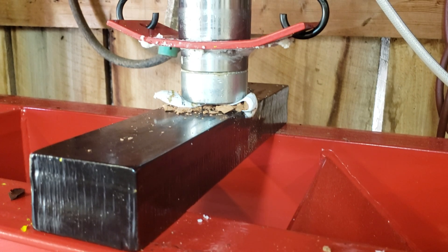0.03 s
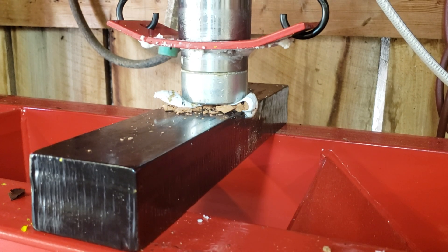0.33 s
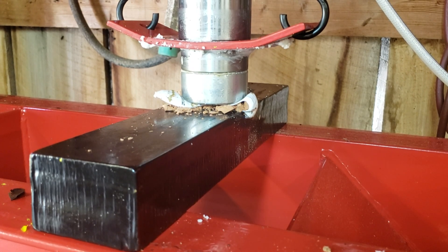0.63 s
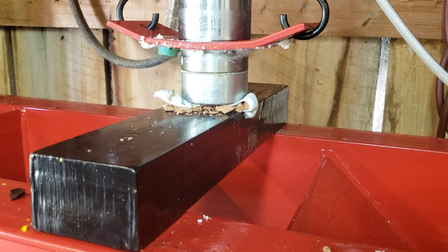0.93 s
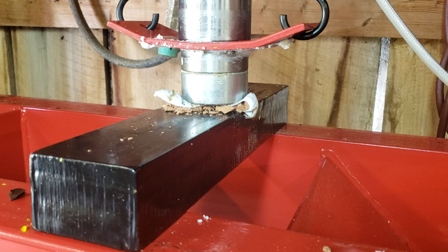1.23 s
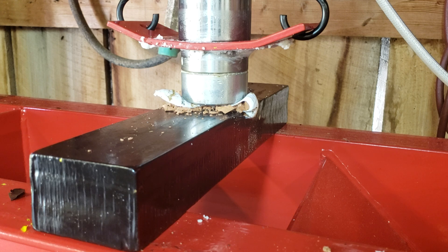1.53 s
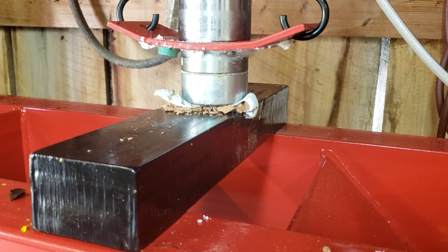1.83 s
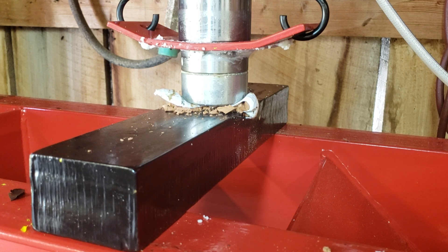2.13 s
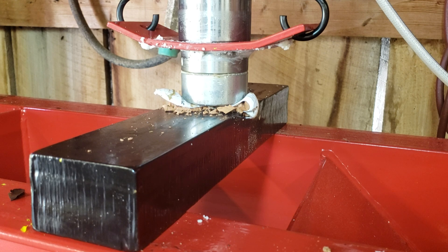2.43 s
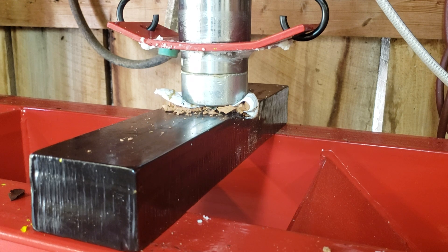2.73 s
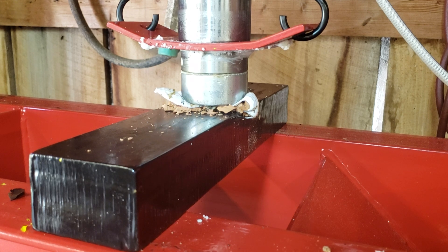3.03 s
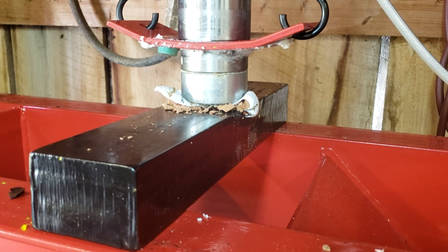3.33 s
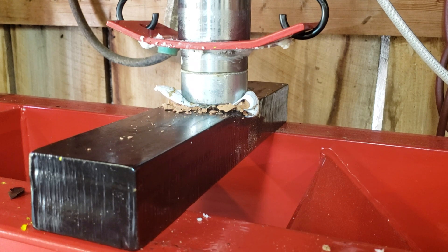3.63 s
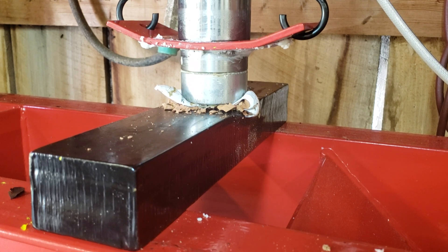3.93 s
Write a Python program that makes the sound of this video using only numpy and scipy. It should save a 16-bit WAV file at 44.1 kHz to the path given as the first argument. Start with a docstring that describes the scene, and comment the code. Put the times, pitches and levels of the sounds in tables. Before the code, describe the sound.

Rapid hissing and knocking from a close air pump driving a hydraulic press, over steady rumble.

```python
"""A sharp hiss, then a knock, about twelve times a second: an air-driven hydraulic pump, close by and
to the right of the microphone in a small wooden workshop. Each stroke vents a jet and a puff of air,
then the piston knocks and rings the steel frame, the casing and the room. As the press takes up load
the pump slows and the knock hardens. The work under the ram gives one faint squeak and, later, one
dry tick. Behind it all lie a steady rumble and a leak of air."""
import sys
import numpy as np
from scipy import signal
from scipy.fft import rfft, irfft
from scipy.io import wavfile
from scipy.ndimage import uniform_filter1d

SR = 44100
rng = np.random.default_rng(int(sys.argv[2]) if len(sys.argv) > 2 else 0)


def log_audio(samples):
    """Write samples as a 16-bit WAV file to the path given in sys.argv[1]."""
    # one column per channel
    frames = np.atleast_2d(samples).T
    # limit to full scale, then quantise
    limited = np.clip(frames, -1, 1)
    pcm = np.round(limited * 32767).astype(np.int16)
    wavfile.write(sys.argv[1], SR, pcm)


N = 176400

# pump speed, falling under load (time [s], rate [strokes/s])
STROKE_RATE = [(0, 13.328), (.3, 13.093), (1.3, 12.584), (2.2, 12.189), (2.65, 12.178), (2.8, 12.032),
               (3.3, 11.909), (4, 11.537)]
# piston knock, straight to the microphone (frequency [Hz], left [dB], right [dB])
KNOCK_COLOUR = [(42.3, 0, -7), (129, 5, 18.5), (312, 21.5, 24.5), (602, 19, 26.5), (930, 8, 18),
                (1224, 9.5, 18.5), (1600, -3, 3.5), (2200, 2.5, -13.5), (5150, -31, -19)]
# diffuse echo of the knock (frequency [Hz], left [dB], right [dB])
KNOCK_ROOM_COLOUR = [(40, 8.5, -9), (125, 16.5, 5.5), (258, 17.5, 7), (468, 14, 28.5), (734, 15, 21),
                     (914, 9, 11), (1170, 8, 13.5), (1480, 14, 12), (1780, -4, 0), (2920, 0.5, 6.5),
                     (3330, -7, -7)]
# hard edge that the knock gains under load (frequency [Hz], left [dB], right [dB])
CLACK_COLOUR = [(395, -6.5, -3), (710, 4, 6), (1290, -12, -8), (1750, -29, -4), (2120, -27, 11),
                (3030, -10, -4), (3350, -27, -14), (4230, -8, 3.5), (8000, -24, -24)]
# resonances of the press frame (frequency [Hz], left [dB], right [dB], t60 [s])
FRAME_MODES = [(325.3, -35.5, -37, 0.36), (358.2, -36.5, -26, 0.29), (400.9, -26.5, -30, 0.26),
               (470, -28, -50, 0.19), (494.2, -31, -28, 0.24), (568, -41.5, -36.5, 0.55),
               (634.6, -21.5, -27.5, 0.2), (666, -27.5, -48, 0.17), (741.6, -52, -28, 0.31)]
# resonances of the pump casing (frequency [Hz], left [dB], right [dB], t60 [s])
CASING_MODES = [(876, -52, -30.5, 0.24), (918, -46, -32, 0.21), (1052, -31.5, -24.5, 0.31),
                (1160, -51, -33.5, 0.45), (1165.6, -56, -31, 0.24), (1366, -39, -22, 0.097),
                (1407, -41, -30, 0.1), (1423, -48, -41, .1), (1647, -49, -38.5, 0.51),
                (2120, -57, -51, 0.063)]
# low resonances of the workshop (frequency [Hz], left [dB], right [dB], t60 [s])
ROOM_MODES = [(42.5, -59, -55, 0.23), (62.6, -36.5, -36, 0.43), (94.8, -32, -38, 0.46),
              (128.76, -27.5, -27, 0.28), (143.3, -30, -27, 0.23), (198.4, -33.5, -32, 0.25),
              (242.8, -34, -39, 0.28)]
# exhaust jet, straight to the microphone (frequency [Hz], left [dB], right [dB])
JET_COLOUR = [(300, -59, -51), (2000, -53, -47), (3430, -37, -29), (4400, -25.5, -18), (5670, -28.5, -21),
              (6500, -11, -14), (8000, -36, -15.5), (10000, -21, -15), (10500, -13, -5.5), (11630, -19, 0),
              (11850, -10, 0.5), (14100, -27, -3.5), (14200, -29, -5), (13600, -26, -10),
              (15500, -29, -5.5)]
# exhaust jet scattered by the workshop (frequency [Hz], left [dB], right [dB])
JET_ROOM_COLOUR = [(200, -17.5, -14.5), (695, -17.5, -16.5), (1670, -23.5, -19), (3380, -23.5, -20),
                   (5720, -27.5, -21), (7240, -38, -11.5), (7500, -19, -9), (9000, -29, -19.5),
                   (10000, -15.5, -19), (10540, -32, -9), (12300, -19, -9.5), (14400, -37, -11),
                   (16400, -13, -40.5)]
# tick of the loaded work (time [s], level [dB])
WORK_TICKS = [(2.5507, -2.5)]
# spectrum of that tick (frequency [Hz], left [dB], right [dB])
TICK_COLOUR = [(500, -13, -9), (3000, 2, -6), (6300, -5, 2), (9000, -6, 7), (15000, -5, -8)]
# steady rumble and leaking air (frequency [Hz], left [dB], right [dB])
ROOM_TONE_COLOUR = [(20, -25, -27), (56, -22, -21), (81, -26, -20), (115, -25, -21.5), (302, -21.5, -16.5),
                    (920, -27.5, -26), (2020, -36, -36.5), (3380, -42.5, -37), (6000, -39.5, -37),
                    (11900, -45, -48), (16000, -35, -32)]

LEAD_IN_S = .4  # the pump is already running
FIRST_KNOCK_CYCLES, VENT_LEAD_CYCLES = .552, .206
LEFT_LAG_S = 0.000405  # the left side of the microphone is farther from the pump
KNOCK_SCATTER_DB, KNOCK_DB_PER_S, KNOCK_T60_S, RATTLE_DB = -0.15, -0.06, 0.21, -12
FLOOR_ECHO_S, FLOOR_ECHO_DB, WALL_ECHO_S, WALL_ECHO_DB = 0.001834, -3.5, .0085, -16
FRAME_DELAY_S, CASING_DELAY_S, BOOM_DELAY_S = 0.00093, 0.001217, 0.0032
CLACK_DB_PER_S, CLACK_T60_S = 3, 0.051
VENT_OPEN_S, VENT_HOLD_S, VENT_FALL_S = .005, 0.0019, 0.0086
VENT_SCATTER_DB, VENT_FLUTTER_DB, VENT_JITTER_S, VENT_DB_PER_S = 0.85, 0.5, 0.00022, .1
NEAR_T60_S, FAR_T60_S, FAR_DB, REFLECTION_BUILD_S = 0.062, 0.31, -2.5, 0.0033
PUFF_HZ, PUFF_DB, PUFF_DELAY_S, PUFF_DB_PER_S = 101, -24.5, 0.0022, -0.3  # levels relative to the vent
SPIT_DB, SPIT_SCATTER_DB, SPIT_DELAY_S = -1, 4, 0.0039
SQUEAK_AT_S, SQUEAK_WIDTH_S, SQUEAK_HZ, SQUEAK_WOBBLE, SQUEAK_DB = .41, 0.087, 3210, 0.038, -39.5
TOP_HZ = 15750


def piston(times):
    """A dull knock, close up: it echoes off floor and wall, rings steel and room, hardens with load."""
    sizes = undb(KNOCK_SCATTER_DB * rng.standard_normal(len(times)))
    blows = impulses(times, sizes) * loading(KNOCK_DB_PER_S)
    off_floor = undb(FLOOR_ECHO_DB) * delay(blows, FLOOR_ECHO_S)
    off_wall = undb(WALL_ECHO_DB) * delay(blows, WALL_ECHO_S)
    knock = -colour(blows + off_floor + off_wall, KNOCK_COLOUR)
    frame = through(delay(blows, FRAME_DELAY_S), ring(FRAME_MODES, build_s=.0015))
    casing = through(delay(blows, CASING_DELAY_S), ring(CASING_MODES, build_s=.0015, spread=1))
    left, right = knock + frame + casing
    boom = -through(delay(blows, BOOM_DELAY_S), ring(ROOM_MODES, build_s=.0012))
    echo = scatter(KNOCK_T60_S, build_s=0.0025)
    # noise that fades with the echo, new on every stroke
    rattle = np.sqrt(np.abs(through(blows, echo ** 2))) * rng.standard_normal((2, len(blows)))
    room = colour(through(blows, echo) + undb(RATTLE_DB) * rattle, KNOCK_ROOM_COLOUR)
    clack = colour(through(blows * loading(CLACK_DB_PER_S), scatter(CLACK_T60_S)), CLACK_COLOUR)
    return np.array([delay(left, LEFT_LAG_S), right]) + boom + room + clack


def exhaust(times, cycles):
    """The valve opens before each knock: a low puff, a spit and a fluttering jet that fills the room."""
    t = clock()
    size, late, spit = rng.standard_normal((len(times), 3)).T
    opens = times - VENT_LEAD_CYCLES * cycles + VENT_JITTER_S * late
    vents = impulses(opens, undb(VENT_SCATTER_DB * size)) * loading(VENT_DB_PER_S)
    age = np.arange(SR // 10) / SR
    opening = np.minimum(age / VENT_OPEN_S, 1) ** 1.1
    emptying = np.exp(-np.maximum(age - VENT_OPEN_S - VENT_HOLD_S, 0) / VENT_FALL_S)
    flow = through(vents, opening * emptying)[0]
    flutter = undb(VENT_FLUTTER_DB * wander(samples=40))
    jet = flow * flutter * rng.standard_normal(len(t))
    jet += impulses(opens + SPIT_DELAY_S, undb(SPIT_DB + SPIT_SCATTER_DB * spit))
    direct = undb(-3) * np.array([delay(jet, LEFT_LAG_S), jet])
    direct += undb(-5) * through(jet, scatter(t60=0.0055))
    near_walls = scatter(NEAR_T60_S, REFLECTION_BUILD_S)
    far_walls = undb(FAR_DB) * scatter(FAR_T60_S, REFLECTION_BUILD_S)
    room = undb(-1.5) * colour(through(jet, near_walls + far_walls), JET_ROOM_COLOUR)
    one_cycle = -np.sin(2 * np.pi * PUFF_HZ * age) * (age < 1 / PUFF_HZ)
    puff = undb(PUFF_DB) * through(delay(vents * loading(PUFF_DB_PER_S), PUFF_DELAY_S), one_cycle)
    return colour(direct, JET_COLOUR) + room + puff


def strokes():
    """The slowing pump knocks once a cycle: knock times and cycle lengths, in seconds."""
    t = np.arange(clock()[0] * SR, N + SR // 10) / SR
    rate = np.interp(t, *np.array(STROKE_RATE).T)
    turns = np.cumsum(rate) / SR
    turns -= np.interp(0, t, turns) + FIRST_KNOCK_CYCLES
    times = np.interp(np.arange(np.ceil(turns[0]), turns[-1]), turns, t)
    return times, 1 / np.interp(times, t, rate)


def tick():
    """A small dry crack from the work under the ram, with a short tail of room."""
    times, db = np.array(WORK_TICKS, float).T
    click = impulses(times, undb(db))
    reflections = scatter(t60=.006) + undb(1) * scatter(t60=0.1)
    return colour(undb(-13) * click + through(click, reflections), TICK_COLOUR)


def squeak():
    """The work gives one faint, rough squeak under the ram, heard off the walls."""
    pitch_hz = SQUEAK_HZ * (1 + SQUEAK_WOBBLE * wander(samples=150))
    tone = np.sin(2 * np.pi * np.cumsum(pitch_hz) / SR)
    swell = np.exp(-((clock() - SQUEAK_AT_S) / SQUEAK_WIDTH_S) ** 2)
    return undb(SQUEAK_DB) * through(tone * swell, scatter(t60=.1))


def room_tone():
    """Steady rumble and a faint leak of air, partly shared by both sides of the microphone."""
    noise = rng.standard_normal((3, len(clock())))
    return colour(undb(-4) * noise[0] + undb(-2.5) * noise[1:], ROOM_TONE_COLOUR)


def undb(db):
    """Decibels to gain."""
    return 10 ** (np.asarray(db) / 20)


def clock():
    """Time of every sample, lead-in included."""
    return np.arange(-int(LEAD_IN_S * SR), N) / SR


def loading(db_per_s):
    """Gain that rises or falls steadily as the press takes up load; 1 halfway through."""
    return undb(db_per_s * (clock() - N / SR / 2))


def wander(samples):
    """Noise smoothed over so many samples, with unit deviation."""
    drift = uniform_filter1d(rng.standard_normal(len(clock())), size=samples)
    return drift / drift.std()


def through(x, response):
    """Play a sound through a mono or stereo impulse response."""
    return signal.fftconvolve(np.atleast_2d(x), np.atleast_2d(response), axes=1)[:, :np.shape(x)[-1]]


def colour(x, table, size=4096):
    """Minimum-phase filter from rows of (frequency [Hz], left [dB], right [dB])."""
    hz, *sides = np.array(table, float).T
    grid = np.log(np.maximum(np.fft.rfftfreq(size, 1 / SR), 1))
    gains = undb([np.interp(grid, np.log(hz), side) for side in sides])
    cepstrum = irfft(np.log(gains))
    cepstrum[:, 1:size // 2] *= 2
    cepstrum[:, size // 2 + 1:] = 0
    return through(x, irfft(np.exp(rfft(cepstrum))))


def delay(x, seconds):
    """The same sound, later."""
    t = clock()
    return np.interp(t - seconds, t, x, left=0)


def impulses(times, sizes):
    """One click at each time."""
    t = clock()
    at = np.round((times - t[0]) * SR).astype(int)
    inside = (at >= 0) & (at < len(t))
    return np.bincount(at[inside], (sizes * np.ones(len(at)))[inside], len(t))


def scatter(t60, build_s=0):
    """Dense fading reflections of unit energy, different left and right."""
    t = np.arange(SR // 2) / SR
    onset = np.clip(t / (build_s + 1 / SR), 0, 1) ** 2
    tail = rng.standard_normal((2, len(t))) * np.exp(-np.log(1000) * t / t60) * onset
    return tail / np.sqrt(np.sum(tail ** 2, axis=1, keepdims=True))


def ring(modes, build_s, spread=0):
    """Decaying modes that take a moment to build; spread 1 sets them swinging out of step."""
    t = np.arange(SR // 2) / SR
    phases = spread * rng.uniform(-np.pi, np.pi, len(modes))
    swing = np.zeros((2, len(t)))
    for (hz, left, right, t60), phase in zip(modes, phases):
        decay = np.exp(-np.log(1000) * t / t60)
        swing += undb([[left], [right]]) * np.sin(2 * np.pi * hz * t + phase) * decay
    return swing * (1 - np.exp(-t / build_s))


def scene():
    """The workshop from the microphone's place, with the pump at work on the right."""
    times, cycles = strokes()
    return (piston(times) + exhaust(times, cycles) + tick() + squeak() + room_tone())[:, -N:]


def record(dry):
    """The recorder clips at full scale and cuts the deepest bass and the top."""
    low_cut = signal.butter(3, 30, "high", fs=SR, output="sos")
    high_cut = signal.ellip(10, .2, 70, TOP_HZ, fs=SR, output="sos")
    return signal.sosfilt(high_cut, signal.sosfilt(low_cut, np.clip(dry, -1, 1)))


dry = scene()
out = record(dry)
log_audio(out)
```